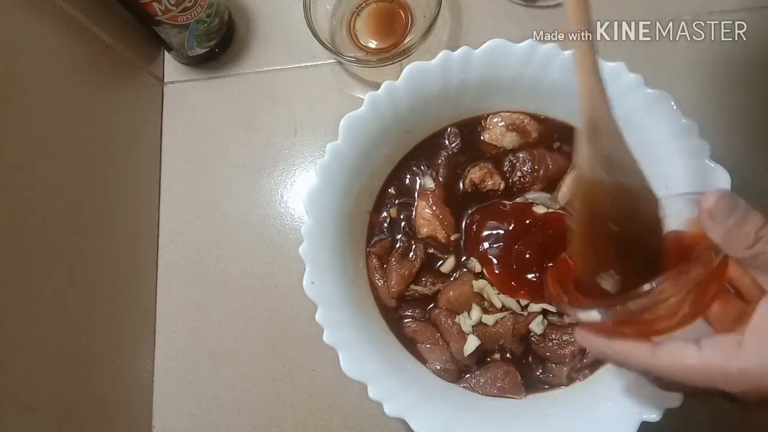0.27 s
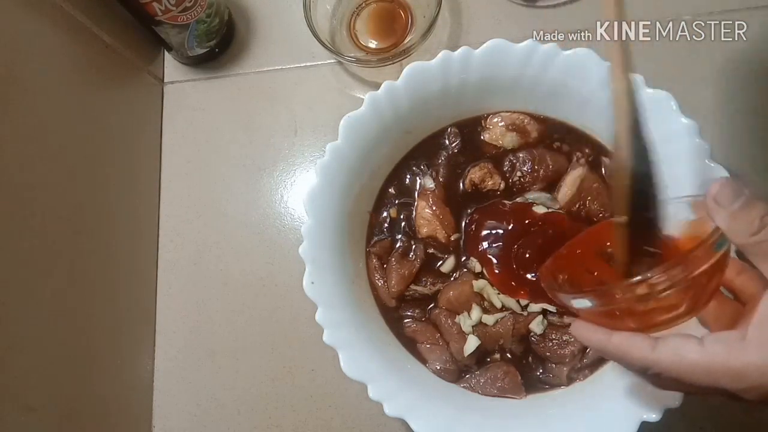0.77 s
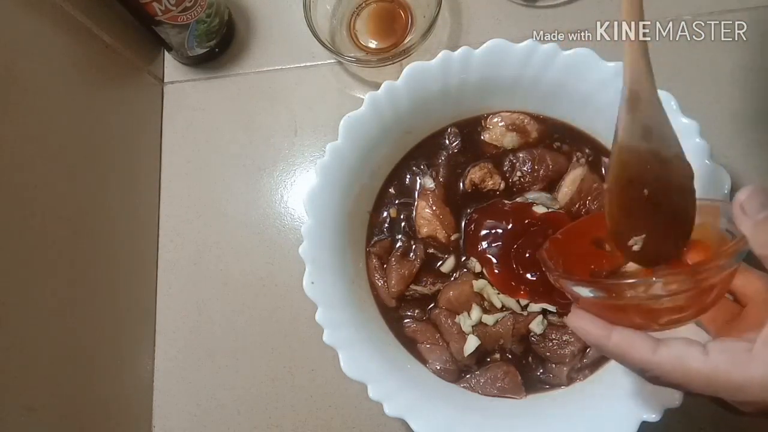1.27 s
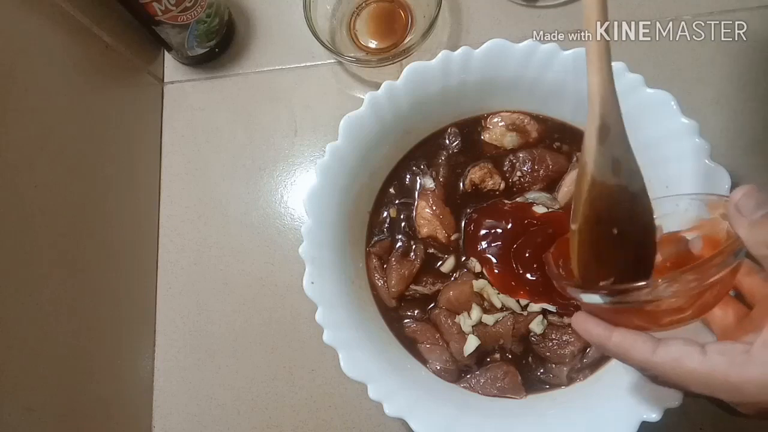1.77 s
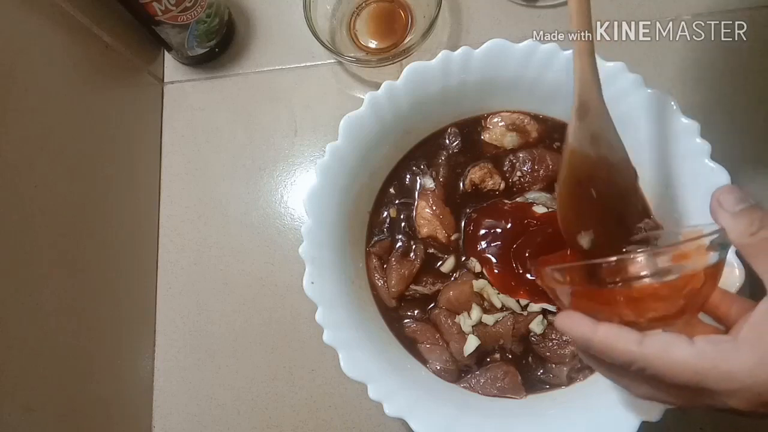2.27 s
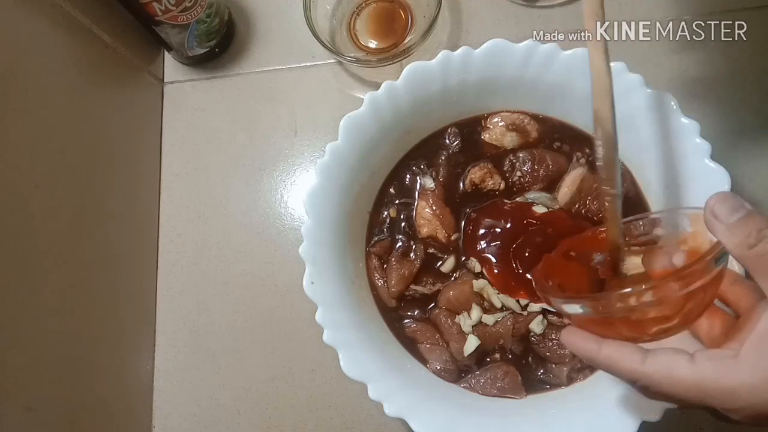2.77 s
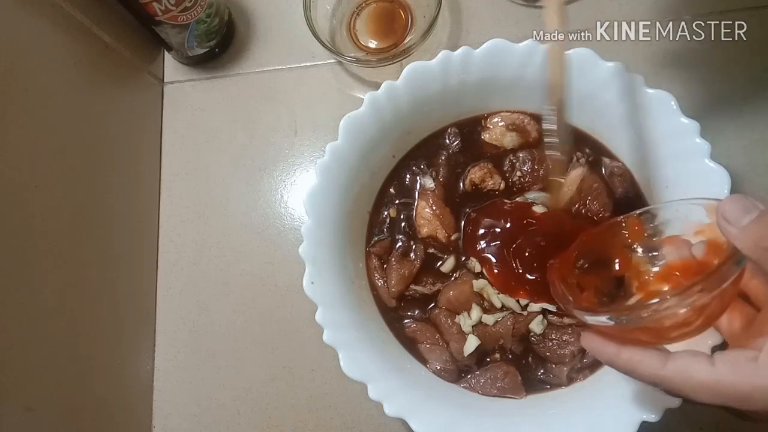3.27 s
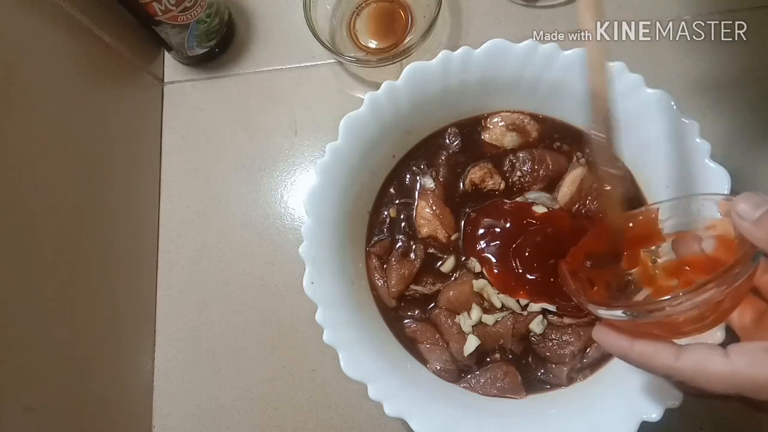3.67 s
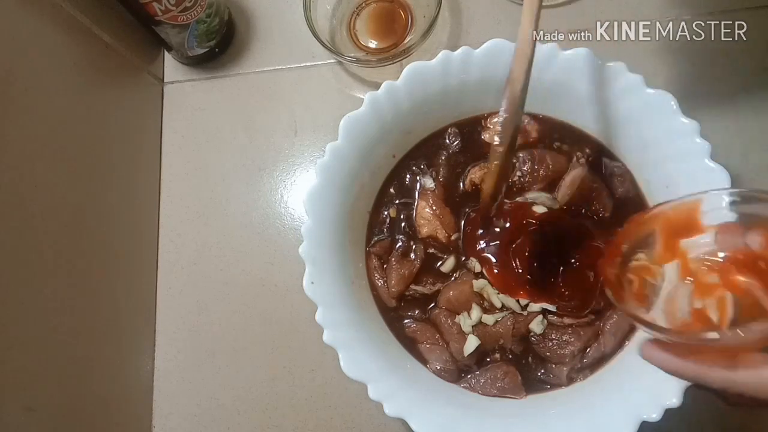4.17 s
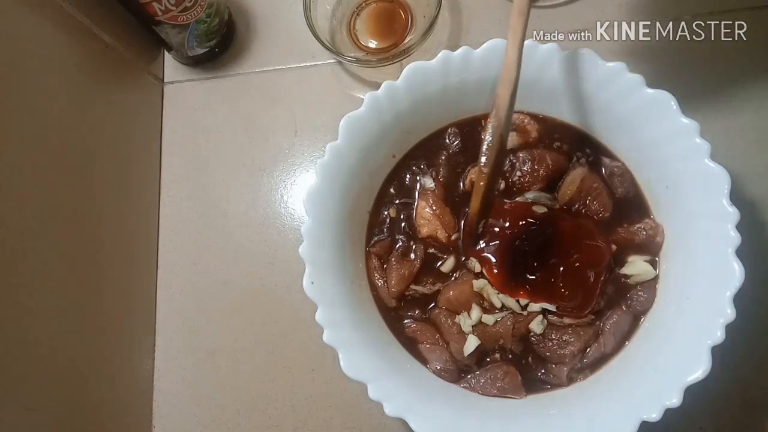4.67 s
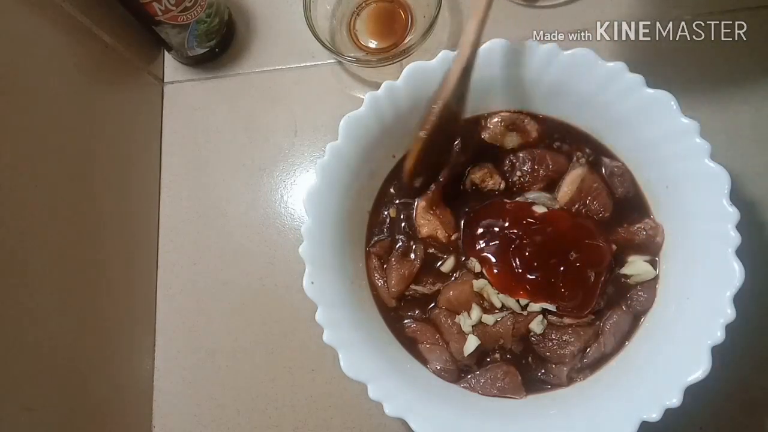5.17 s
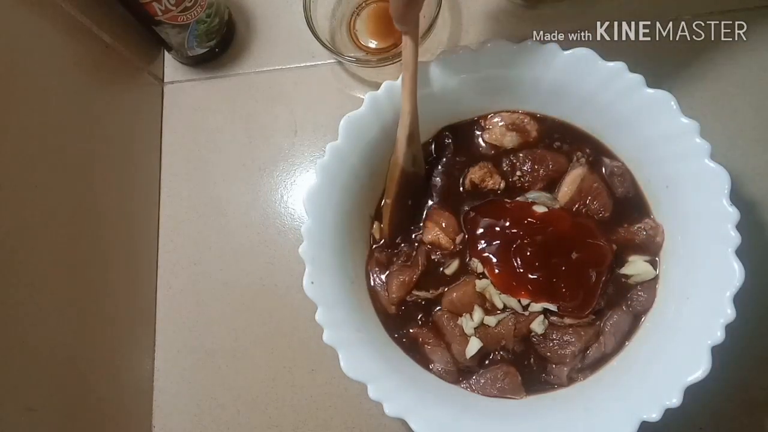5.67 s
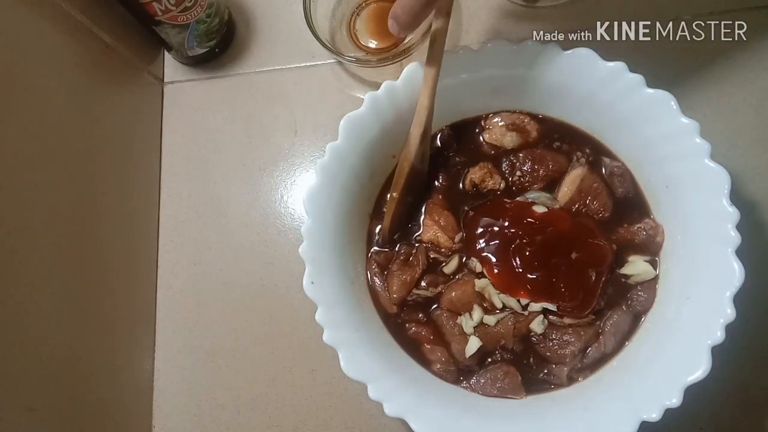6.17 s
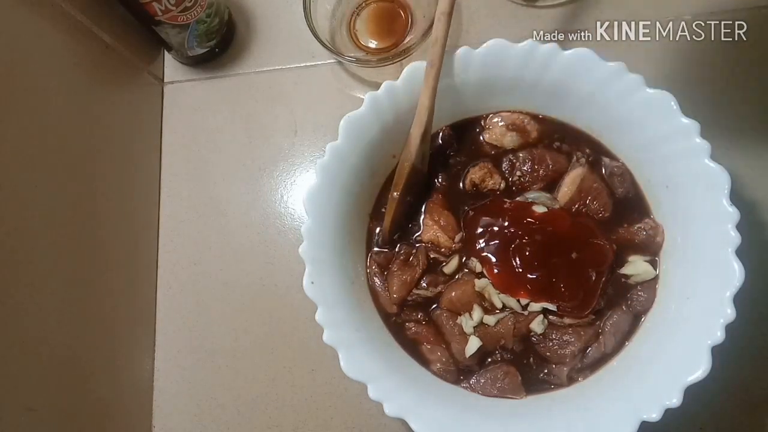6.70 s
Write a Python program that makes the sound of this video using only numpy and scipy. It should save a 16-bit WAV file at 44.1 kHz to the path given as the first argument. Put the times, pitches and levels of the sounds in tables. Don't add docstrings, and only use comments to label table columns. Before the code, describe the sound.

In a small tiled kitchen, a wooden spoon raps a hand-held glass bowl with short, dry woody knocks and damped glass clinks, irregular for nearly four seconds. After a pause with only low fridge hum and hiss, the bowl lands on the counter, ringing and rattling faster to rest, then clinks and grinds into another bowl. The stack drags briefly with low bumps. Close small microphone, short hard reflections, nearly mono.

```python
import sys
import numpy as np
from scipy import signal
from scipy.fft import rfft, irfft, next_fast_len
from scipy.io import wavfile
from scipy.ndimage import uniform_filter1d

SR = 44100
rng = np.random.default_rng(int(sys.argv[2]) if len(sys.argv) > 2 else 0)


def convert_level_to_amplitude(level_db):
    exponent = np.asarray(level_db, float) / 20
    return 10 ** exponent


def output_pcm(signal):
    pcm = np.clip(np.atleast_2d(signal).T, -1, 1) * 32767
    wavfile.write(sys.argv[1], SR, np.round(pcm).astype(np.int16))


N = 305809

# start_s, blade_db, handle_db, glass_rim_db, contact_hardness_db
SPOON_TAPS = [(.0075, -35, -48.5, -43, -53), (0.3787, -31, -34.5, -27.5, -32),
              (0.4716, -30, -24, -29.5, -34), (0.558, -58, -72, -64, -62), (.7486, -39, -30, -30.5, -34.5),
              (0.8674, -33.5, -52, -34.5, -57), (1.143, -56, -73, -76, -53), (1.3064, -28, -27.5, -36, -53),
              (1.4829, -44, -38.5, -36, -34), (1.496, -36, -60, -56, -55), (1.585, -35, -38.5, -31, -48),
              (1.7745, -57, -79, -52, -47), (2.1787, -39, -37, -33, -50), (2.197, -35, -61, -50, -63),
              (2.5291, -42, -39.5, -34, -41), (2.8505, -34, -48, -19.5, -26), (3.145, -51, -81, -51, -53),
              (3.2558, -55, -73, -56, -40), (3.4483, -33, -50, -38, -27.5), (3.552, -58, -71, -51, -52),
              (3.8642, -44, -77, -43.5, -54)]
# thud_db, neck_db, edge_db, tip_db, crack_db
TAP_COLOUR = [(2.5, 2, -1, -3, -6), (0, 4, 0, 5, -6), (-7.5, 3.5, 4.5, -0.5, -0.5), (0, -3, .1, .1, .1),
              (7.5, -8, 1, 7, -0.5), (-2, 1, -6, .1, -8), (5.5, -2, .1, .1, .1), (-5, 4, -3, 4, -8),
              (2, -3, 4, 4.5, 4), (-9, 0, 6, .1, -3), (-5, 0, -4, 8.5, -3), (4, -3, .1, .1, .1),
              (-8, -4, -7.5, -1, 0), (6.5, -4, 3, .1, -2), (2, 1, 0, -4, 13.5), (0, .1, -4, .1, -3),
              (-3, -2, .1, .1, .1), (-5, .1, .1, .1, .1), (-9, .1, -10, .1, -1), (4, -4, .1, .1, .1),
              (5, -4, .1, .1, .1)]
# start_s, then four columns level_db
FIRM_KNOCKS = [(.0003, -36, -42, -30.5, -45), (.3782, -33, -27, -11.5, -27), (0.472, -40, -39, -17, -33),
               (0.7482, -32.5, -24, -18, -34), (1.3061, -40, -32, -16, -24), (1.483, -38, -33, -40, -21),
               (1.585, -49, -45, -25, -36), (2.1791, -38, -41, -37, -29), (2.5299, -46, -46, -25, -36),
               (2.8507, -42, -37, -24, -34), (3.4488, -50, -41.5, -31, -45)]
# pitch_hz, level_db, t60_s
STACK_LOW_MODES = [(1360, -7.5, 0.031), (1450, -6, 0.017), (1726, 2.5, 0.031), (2000, -6, 0.023),
                   (2190, -9, 0.024)]


def rms_one(x):
    return x / np.sqrt(np.mean(x ** 2) + 1e-20)


def in_time(rows, off_db=-120):
    s, *columns = np.transpose(rows)
    return [np.interp(np.arange(N) / SR, s, c, off_db, off_db) for c in columns]


def stroke(s, level_db, attack_s, hold_s, fall_db_s, rise_db=14):
    release_s = s + hold_s
    points = [(s - attack_s, level_db - rise_db), (s, level_db),
              (release_s, level_db), (release_s + 40 / fall_db_s, level_db - 41)]
    return in_time(points)[0]


def drift(rate):
    knots = rng.standard_normal(400)
    return np.interp(np.arange(N) / SR * rate, np.arange(len(knots)), knots)


def coloured(spectrum):
    size = next_fast_len(N)
    hz, level_db = np.transpose(spectrum)
    bins_hz = np.arange(1, size // 2 + 2) * SR / size
    shape = convert_level_to_amplitude(np.interp(np.log(bins_hz), np.log(hz), level_db))
    return rms_one(irfft(rfft(rng.standard_normal(size)) * shape, size)[:N])


def ring(clicks, hz, t60):
    r, w = convert_level_to_amplitude(-60 / (t60 * SR)), 2 * np.pi * hz / SR
    return signal.lfilter([0, np.sin(w)], [1, -2 * r * np.cos(w), r * r], clicks + 1e-18)


def strike(times, blow_db, modes, detune=0.013, chatter_db=-12, chatter_s=0.0063, crack=2.0):
    hz, level_db, t60 = np.transpose(modes)[:, :, None]
    out, t = np.zeros(N + SR), np.arange(SR // 10) / SR
    chance = rng.standard_normal((len(times), 2, len(modes), 1))
    chatter = rng.standard_normal((len(times), len(t))) * np.exp(-t / chatter_s)
    chatter *= convert_level_to_amplitude(chatter_db) / np.sqrt(chatter_s * SR / 2)
    chatter[:, 0] = 1
    contact = (1 - np.exp(-t / 0.00029)) * (1 + crack * np.exp(-t / 0.00092))
    sign = (-1.) ** np.arange(len(modes))[:, None]
    for s, strength_db, (louder, higher), grains in zip(times, blow_db, chance, chatter):
        waves = np.sin(2 * np.pi * hz * (1 + detune * higher) * t) * convert_level_to_amplitude(-60 * t / t60)
        blow = np.sum(sign * convert_level_to_amplitude(strength_db + level_db + louder) * waves, axis=0) * contact
        out[int(s * SR):][:2 * len(t) - 1] += signal.fftconvolve(blow, grains)
    return out[:N]


def rub(level_db, per_s, modes, uneven_db):
    moving = np.flatnonzero(level_db > -100)
    span, out = slice(moving[0], moving[-1] + SR // 8), np.zeros(N)
    sizes = convert_level_to_amplitude(uneven_db * np.minimum(rng.exponential(1, N), 4)) * rng.choice([-1, 1], N)
    slips = (sizes * (rng.random(N) < per_s / SR) * convert_level_to_amplitude(level_db))[span]
    for k, (hz, gain_db, t60) in enumerate(modes):
        out[span] += convert_level_to_amplitude(gain_db) * ring(np.roll(slips, 7 * k) * (-1) ** k, hz, t60)
    return out


def air():
    # pitch_hz, density_db_per_hz
    hiss_spectrum = [(200, -5.5), (300, -28), (450, -10), (750, -10), (1100, -6), (1600, -8), (2490, -11),
                     (4600, -9), (6100, -9), (7470, -3), (9000, -11), (10800, -18), (15500, -22),
                     (15900, -70)]
    # pitch_hz, width_hz, level_db
    standing_waves = [(371, 24, -62), (471, 13, -72), (539.5, 27, -70), (597, 21, -64), (805, 3.2, -68.5),
                      (933, 110, -68.5), (1083, 22, -62), (1580, 14, -68.5)]
    hiss = convert_level_to_amplitude(-48 + 0.22 * drift(3.2)) * coloured(hiss_spectrum)
    for hz, width_hz, level_db in standing_waves:
        wave = rms_one(ring(rng.standard_normal(N), hz, 2.6 / width_hz))
        hiss = hiss + convert_level_to_amplitude(level_db + 2.0 * drift(4)) * wave
    return hiss


def side_hiss():
    # pitch_hz, density_db_per_hz
    side_spectrum = [(30, -21), (120, -15), (301, -7), (431, -8.5), (3440, -12.5), (5500, -18),
                     (9000, -30.5), (15000, -22)]
    return convert_level_to_amplitude(-71 + 3.6 * drift(8)) * coloured(side_spectrum)


def fridge():
    # start_s,
    # level_db
    hum_level = [(0, -48), (1.0, -47), (1.4, -50), (2.4, -48), (3.2, -52), (3.5, -45.5), (4.3, -49.5),
                 (4.6, -53.5), (5.4, -51.5), (5.6, -55), (6.3, -55), (6.44, -44), (6.56, -54), (6.93, -58)]
    # multiple, level_db
    hum_orders = [(1, 5), (2, -35), (3, -20), (4.5, -19), (5, -31)]
    # pitch_hz, density_db_per_hz
    rumble_spectrum = [(20, -48), (40, -20), (54, -1.5), (68, -9), (87, 4.5), (102, -4.5), (120, -0.5),
                       (140, -1.5), (157, -4), (185, -22), (215, -34), (245, -12), (290, -28), (400, -71)]
    mains_hz = 119.3
    hum_db, = in_time(hum_level, off_db=-45)
    phase = 2 * np.pi * np.cumsum(mains_hz + 2.195 * drift(9)) / SR
    hum = sum(convert_level_to_amplitude(level_db + 2.6 * drift(12.0)) * np.sin(k * phase) for k, level_db in hum_orders)
    rumble = convert_level_to_amplitude(-49.5 + 2.8 * drift(9.1)) * coloured(rumble_spectrum)
    return convert_level_to_amplitude(hum_db - 1.0) * hum + rumble


def booms():
    # start_s, level_db, hold_s
    swells = [
        (1.165, -42, 0.1),
        (1.565, -46.5, 0.27),
        (6.113, -47, 0.18),
    ]
    level_db = np.max([stroke(s, db, 0.056, hold_s, 200) for s, db, hold_s in swells], axis=0)
    return convert_level_to_amplitude(level_db) * rms_one(ring(rng.standard_normal(N), 87.9, 0.79))


def kitchen(x):
    room_t60_s, wall_cut_hz, pose_s = 0.12, 5200, 0.12
    t, noise, hop = np.arange(SR // 4) / SR, rng.standard_normal(SR // 2), int(pose_s * SR)
    shape = convert_level_to_amplitude(-60 * t / room_t60_s) * np.clip(t / 0.0057 - .4, 0, 1)
    out, fade = np.zeros(N + SR), np.hanning(2 * hop + 1)[:-1]
    walls = signal.butter(1, wall_cut_hz, fs=SR)
    for at in range(-hop, N, hop):
        start = max(at, 0)
        tail = signal.lfilter(*walls, np.roll(noise, at)[:len(t)] * shape)
        part = x[start:at + 2 * hop] * fade[max(-at, 0):][:N - start]
        echo = signal.fftconvolve(part, tail / np.sqrt(np.sum(tail ** 2)))
        out[start:][:len(part) + len(t) - 1] += echo
    return out[:N]


def scuff():
    return rub(stroke(5.875, -65, .008, .035, 400), 1500, STACK_LOW_MODES, 2.5)


def dragging():
    # start_s, level_db, hold_s
    pulls = [
        (6.002, -42, 0.38),
        (6.457, -47, .004),
    ]
    # pitch_hz, level_db, t60_s
    drag_modes = [(100, 3, 0.14), (123, -0.5, 0.064), (185, 1, 0.099), (254, -3, 0.067), (370, -2.5, 0.052),
                  (470, -6, 0.091), (604, -2, 0.042), (824, 1.5, 0.029), (1120, 6, 0.011)]
    # start_s, level_db
    bumps = [(6.003, -39), (6.028, -46), (6.056, -45), (6.099, -42), (6.123, -34.5), (6.157, -36),
             (6.209, -47), (6.243, -45), (6.273, -41), (6.337, -37), (6.364, -44), (6.41, -48),
             (6.455, -52)]
    # pitch_hz, level_db, t60_s
    foot_modes = [(104, 2.5, 0.031), (128, -0.5, 0.083), (193, -0.5, 0.05), (255, -4, 0.049),
                  (390, -14, .035), (610, -14, 0.023)]
    drag_db = np.maximum(*[stroke(s, db, 0.043, hold_s, 500) for s, db, hold_s in pulls])
    slips = rub(drag_db - 18.5, 1200, drag_modes, 2.5)
    return slips + strike(*np.transpose(bumps), foot_modes, 0.053, chatter_db=-2, chatter_s=.006, crack=.3)


def seating():
    # start_s, level_db
    contacts = [
        (5.6626, -21),
        (5.6695, -23),
    ]
    # pitch_hz, level_db, t60_s
    seat_modes = [(1560, -6, .02), (1725, 0, .032), (1960, -7, .025), (2280, -9, .025)]
    return strike(*np.transpose(contacts), seat_modes, .002, chatter_db=-12, crack=.4)


def stacking():
    # start_s, low_knock_db, middle_db, ring_db
    clinks = [(5.5888, -34, -38, -22.5), (5.5935, -36, -29, -17), (5.5957, -27, -22, -27),
              (5.5998, -29, -30, -18.5), (5.605, -38, -25, -23), (5.611, -31, -22, -36),
              (5.626, -36, -43, -39), (5.6627, -15.5, -32, -44), (5.6655, -29, -20, -13),
              (5.667, -15, -25, -11), (5.6698, -24, -32, -27), (5.674, -28, -37, -29),
              (5.6803, -31, -33, -23), (5.696, -43, -38, -30), (5.706, -38, -37, -38),
              (5.7486, -34, -35, -32), (5.878, -38, -56, -57)]
    # pitch_hz, level_db, t60_s
    middle_modes = [(2460, -3.5, 0.023), (2770, 0.3, 0.032), (2990, -1, .025), (3200, -6, 0.027),
                    (3600, -8, .02), (4160, -16, .035), (4260, -3, 0.045), (4500, -11, 0.032),
                    (4660, 1.5, .025), (5163, -6, .025), (5600, -7, .02), (6130, -6, .02)]
    # pitch_hz, level_db, t60_s
    ring_modes = [(6600, -12, .02), (7060, 0, 0.026), (7260, -5.5, 0.038), (7530, -6, .045),
                  (7620, 2.5, 0.034), (7740, -11, .035), (8000, -14, .035), (8320, -14, .03),
                  (8720, -13, 0.022), (10800, -15, .03), (11100, -22, 0.014), (11680, -19.5, .035),
                  (14570, -31, .035), (15090, -28, .04)]
    # start_s, level_db
    settle = [
        (5.621, -36.5),
    ]
    # start_s, level_db, fall_db_per_s
    grinds = [
        (5.591, -19.5, 830),
        (5.667, -22, 520),
    ]
    s, low_db, mid_db, ring_db = np.transpose(clinks)
    touches = strike(s, low_db - 5.5, STACK_LOW_MODES, .004, chatter_db=-10.0, crack=0.41)
    touches += strike(s, mid_db - 8.5, middle_modes, chatter_db=-7, crack=0.61)
    touches += strike(s, ring_db - 6.0, ring_modes, 0.0021, chatter_db=3.5, crack=0.2)
    s, thud_db = np.transpose(settle)
    counter_modes = [(360, 3, 0.065), (447, 1.0, 0.035), (670, -3.0, .05)]     # pitch_hz, level_db, t60_s
    touches += strike(s, thud_db - 2.5, counter_modes, chatter_db=-1.5, chatter_s=0.012, crack=.1)
    grind_db = np.maximum(*[stroke(s, db, 0.0049, 0.009, fall) for s, db, fall in grinds])
    return touches + rub(grind_db - 25.0, 1500, middle_modes + ring_modes, 4.6)


def bouncing_bowl():
    # start_s, knock_db, first_ring_db, second_ring_db, third_ring_db
    bounces = [(5.2071, -21, -26.5, -30.5, -15), (5.2384, -22.5, -43, -29, -12),
               (5.2557, -24.5, -26, -28, -24), (5.2687, -22.5, -32, -27, -29), (5.2743, -40, -39, -29, -44),
               (5.281, -27, -36, -29, -38), (5.2898, -28, -35, -36, -29), (5.299, -25.5, -38, -35, -31),
               (5.304, -28, -36, -36, -42), (5.31, -35, -35, -30, -19), (5.3146, -29, -32, -34, -21),
               (5.32, -33, -44, -31, -27), (5.3247, -31, -38, -35, -25), (5.3286, -40, -54, -31.5, -26),
               (5.336, -47, -55, -35, -32)]
    swell_factors = [.7, 2.1, 1.1, .9, .9, .9, .9, .9, .9, .7, .8, .9, .9, .9, .9]
    # pitch_hz, level_db, t60_s, swell_s
    glass_groups = [
        [(1934, -0.6, 0.68, 0.00072)],
        [(4140, 2, 0.45, 0.0014), (4200, -8, 0.27, 0.0016)],
        [(7060, 11.5, 0.065, 0.0037), (7030, -2, 0.13, .001), (7381, -18, .2, .001), (7760, -15, .07, .001),
         (7860, -16, .2, .001)],
        [(10725, 2.5, 0.23, .0004), (11630, -7, .2, .0008), (14570, -15, .15, .0008), (15100, -7, .2, .0015)],
    ]
    # pitch_hz, level_db, t60_s
    counter_modes = [(1550, 2, 0.0093), (1714, 2, 0.02), (2350, 6, 0.0032), (2830, -5, 0.036),
                     (2940, 2, 0.016), (3200, 5, 0.013), (3780, -6.5, .012), (4600, -5, 0.023),
                     (4780, -10, 0.036), (5140, -12, 0.093), (5600, -9, 0.031), (6200, -4, 0.013),
                     (6870, -1, .02), (7270, 7.5, .015), (8200, -7, 0.023), (9000, -16, .012)]
    choke_s, last_ring_s = 0.0012, 0.011
    phase_jump = 0.33
    s, knock_db, *ring_db = np.transpose(bounces)
    top_db = -54.5 + 21.5 * np.exp(-(s - s[0]) / 0.088)
    levels_db = np.transpose([*ring_db, top_db])
    out, t = np.zeros(N), np.arange(SR // 8) / SR
    for start, gap, slow, groups_db in zip(s, np.append(np.diff(s), 0), swell_factors, levels_db):
        choke = np.exp(-np.maximum(t - gap, 0) / (choke_s if gap else last_ring_s))
        at = int(start * SR)
        for group_db, modes in zip(groups_db, glass_groups):
            for hz, level_db, t60, swell_s in modes:
                shape = (1 - np.exp(-t / (slow * swell_s))) ** 2 * convert_level_to_amplitude(-60 * t / t60) * choke
                cycles = hz * (t + at / SR) + phase_jump * rng.standard_normal()
                out[at:at + len(t)] += convert_level_to_amplitude(group_db + level_db) * shape * np.sin(2 * np.pi * cycles)
    knocks = strike(s, knock_db - 5.0, counter_modes, 0.012, chatter_db=-6.0, chatter_s=0.0052, crack=1.67)
    return out, knocks


def loose_handle():
    # pitch_hz, level_db, t60_s
    handle_modes = [(2126, 0, 0.12), (2974, -0.5, .2), (3240, -5, .11), (3155, -8, 0.11), (4400, -6, .09)]
    # handle_db, rim_db
    levels_db = [(-60, -55), (-46, -44), (-30, -38), (-39, -42), (-38, -50), (-46, -55), (-55, -31),
                 (-44, -32), (-56, -44), (-60, -44), (-60, -40)]
    rim_hz, rim_t60_s = 1848, .09
    hz, level_db, t60 = np.transpose(handle_modes)[:, :, None]
    out, t = np.zeros(N), np.arange(SR // 5) / SR
    sing = np.sum(convert_level_to_amplitude(level_db - 60 * t / t60) * np.sin(2 * np.pi * hz * t), axis=0)
    sing = sing * (1 - np.exp(-t / .004))
    rim = convert_level_to_amplitude(-60 * t / rim_t60_s) * np.sin(2 * np.pi * rim_hz * t) * (1 - np.exp(-t / .003))
    for (s, *_), levels in zip(FIRM_KNOCKS, convert_level_to_amplitude(np.array(levels_db))):
        out[int(s * SR):][:len(t)] += levels @ [sing, rim]
    return out


def wood():
    # pitch_hz, t60_s, partner_hz, partner_db
    mode_pairs = [(447, 0.063, 430, -16.5), (705, 0.053, 643, -6), (1540, .04, 1440, -7.5),
                  (2110, 0.034, 2250, -8), (2540, 0.023, 2670, -3), (2951, 0.028, 3300, -7),
                  (3240, 0.027, 3360, -3), (3890, 0.029, 3720, -8), (4374, 0.033, 4230, -4),
                  (4660, 0.025, 4370, -3), (5160, .03, 5450, -5), (5870, 0.033, 5680, -2)]
    middle_db = [(-50, -46, -46, -51), (-28, -15, -14, -43), (-26, -13, -7.5, -19), (-29, -10, -11.5, -36),
                 (-20.5, -15, -15, -17), (-18, -16, -17.5, -27), (-32, -28.5, -28, -38),
                 (-22, -16, -26, -43), (-32, -30, -22.5, -35), (-35, -30, -34, -47), (-37, -36, -45, -44)]
    high_db = [(-40.5, -54, -54, -53), (-25, -20.5, -28, -38), (-21, -20, -19, -28), (-27, -32, -24, -24),
               (-15.5, -26, -45, -32), (-26, -31, -28, -32), (-40, -38, -38, -42), (-31, -37, -44, -44),
               (-33, -36, -43, -42), (-25.5, -33, -39, -44), (-49, -49, -47, -54)]
    hz, t60, partner_hz, partner_db = np.transpose(mode_pairs)[:, :, None]
    out, t = np.zeros(N), np.arange(SR // 10) / SR
    pairs = np.sin(2 * np.pi * hz * t) + convert_level_to_amplitude(partner_db) * np.sin(2 * np.pi * partner_hz * t)
    pairs = pairs * convert_level_to_amplitude(-60 * t / t60) * (-1.) ** np.arange(len(mode_pairs))[:, None]
    pairs = pairs * (1 - np.exp(-t / 0.00042)) * (1 + 0.33 * np.exp(-t / 0.0018))
    for s, *modes_db in np.hstack([FIRM_KNOCKS, middle_db, high_db]):
        out[int(s * SR):][:len(t)] += convert_level_to_amplitude(np.array(modes_db) - 4.5) @ pairs
    return out


def wet_crack():
    # pitch_hz, level_db, t60_s
    crack_modes = [(754, -4.5, 0.0089), (1190, 3.5, 0.014), (1730, 0, 0.0075), (2570, 1, .005),
                   (3900, -17, 0.0032), (5200, 1, .004)]
    s, blade_db, handle_db = np.transpose(SPOON_TAPS)[:3]
    crack_db = np.maximum(blade_db, handle_db) - 14.5 + np.transpose(TAP_COLOUR)[4]
    return strike(s, crack_db, crack_modes, 0.036, chatter_db=11.0, chatter_s=0.012, crack=0.28)


def spoon():
    # pitch_hz, level_db, t60_s
    blade = [(1310, -6, 0.034), (1420, -2.5, 0.009), (1540, 3.5, 0.026), (1655, -3, 0.02),
             (1090, -15, 0.012), (890, -11, 0.011), (1590, 2, 0.0049)]
    thud = [(467, -3.5, 0.13), (574, -4.5, 0.044), (680, 1, 0.045), (800, -21, 0.021)]
    neck = [(1993, 4.5, 0.053), (1960, 3, 0.021), (2290, 5.5, 0.0056), (2830, 3.5, 0.013),
            (2220, 8, 0.0068)]
    handle = [(2770, 7.5, 0.015), (2830, 1, 0.0059), (3035, 4.5, 0.02), (3250, -7, 0.013),
              (3100, -0.5, 0.017), (3390, -13, 0.015), (3310, -41.5, 0.0071), (3180, 10, 0.0055)]
    held_glass = [(1847, -0.5, 0.036), (1896, -5.5, 0.034)]
    edge = [(3740, 0, 0.024), (3650, -7, 0.007), (4280, -2, 0.025), (4240, 5, 0.031), (4450, 3, 0.015),
            (4464, -9, 0.023), (4440, 0.5, 0.003)]
    tip = [(4830, -23, 0.0094), (5270, -9, 0.013), (5450, -2.5, 0.03), (6050, -3, 0.019), (6050, 1, 0.019),
           (6430, -2, 0.028), (7210, -2.5, 0.029), (8340, -3, 0.023), (8620, -6, 0.013)]
    overtones = [(4290, -8, 0.049), (6870, -9, .02), (7540, 0.5, 0.063), (7730, -6, 0.047),
                 (8350, -3, .015), (9200, -16, .012), (10200, -12, .012), (11400, -16, .03)]
    # offset_db, blade_share, handle_share, rim_share, hardness_share
    followers = [(-18, 0.24, 0.28, -0.17, 0.16), (-26.5, -0.42, 0.84, 0.069, -0.18),
                 (1.5, 0.14, 0.73, 0.17, 0.099), (-14, -0.14, 0.74, -0.14, 0.35)]
    s, blade_db, handle_db, glass_db, overtone_db = np.transpose(SPOON_TAPS)
    drive = [np.ones(len(s)), blade_db, handle_db, glass_db, overtone_db]
    thud_db, neck_db, edge_db, tip_db = np.array(followers) @ drive + np.transpose(TAP_COLOUR)[:4]
    body = strike(s, blade_db - 7.5, blade, chatter_db=6.5, chatter_s=0.0032)
    body += strike(s, thud_db - 4.5, thud, 0.024, chatter_db=-2.0, chatter_s=0.01)
    body += strike(s, neck_db - .8, neck, chatter_db=-8.0, chatter_s=0.018)
    body += strike(s, handle_db, handle, chatter_db=-8.0, chatter_s=0.0078)
    rim = strike(s, glass_db + 10, held_glass, 0.0028, chatter_db=-18, chatter_s=0.0039, crack=0.091)
    bright = strike(s, edge_db - 3.0, edge, chatter_db=8.0, chatter_s=0.0066)
    bright += strike(s, tip_db - 6.0, tip, chatter_db=7.0, chatter_s=0.0069)
    bright += strike(s, overtone_db - 4.5, overtones, 0.0021, chatter_db=-35, chatter_s=0.0049, crack=0.21)
    return rim, body + bright


def scene():
    free_ring, counter = bouncing_bowl()
    rim, taps = spoon()
    blows = taps + wood() + loose_handle() + counter + stacking() + convert_level_to_amplitude(-3.5) * free_ring
    reflections = convert_level_to_amplitude(-13) * kitchen(blows + convert_level_to_amplitude(-5) * rim)
    mid = blows + convert_level_to_amplitude(-5.0) * free_ring + rim + reflections
    mid = mid + dragging() + scuff() + seating() + wet_crack()
    mid = mid + fridge() + booms() + air()
    side = side_hiss()
    return np.array([mid + side, mid - side])


def roll_off(x):
    return signal.sosfilt(signal.butter(12, 16620, fs=SR, output="sos"), x)


def record(dry, threshold_db=-30, squeeze=0.041, release_db_s=12):
    soft_top, cutoff_hz = .7, 16900
    level_db = 10 * np.log10(uniform_filter1d(dry[0] ** 2, size=220) + 1e-12)
    ramp = release_db_s * np.arange(N) / SR
    excess_db = squeeze * np.maximum(level_db - threshold_db, 0)
    duck_db = np.maximum.accumulate(excess_db + ramp) - ramp
    bass_cut = signal.butter(2, 45, "high", fs=SR, output="sos")
    treble_cut = signal.cheby2(10, 60, cutoff_hz, fs=SR, output="sos")
    dry = signal.sosfilt(bass_cut, dry)
    dry = signal.sosfilt(treble_cut, soft_top * np.tanh(dry / soft_top))
    return roll_off(dry * convert_level_to_amplitude(-uniform_filter1d(duck_db, size=200)))


dry = scene()
out = record(dry)
output_pcm(out)
```